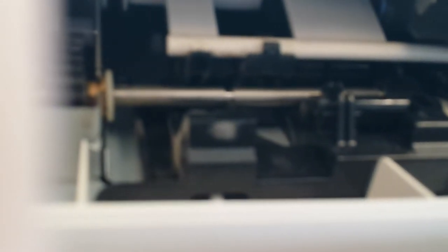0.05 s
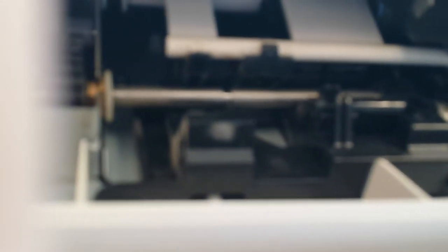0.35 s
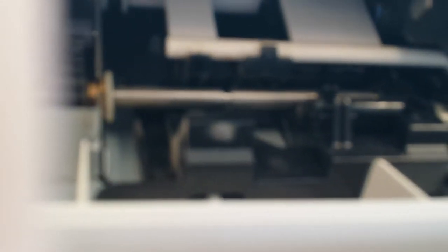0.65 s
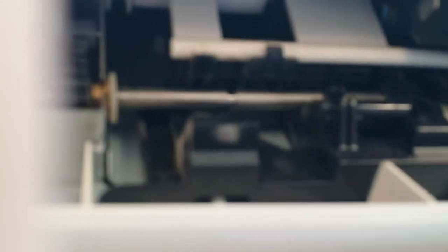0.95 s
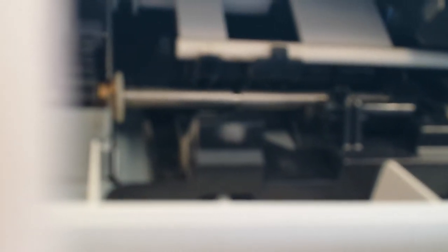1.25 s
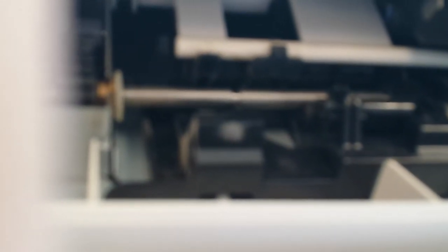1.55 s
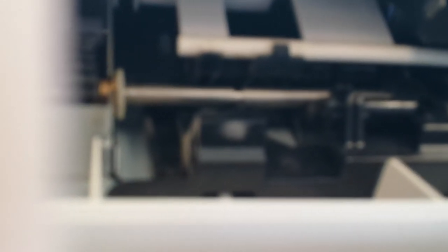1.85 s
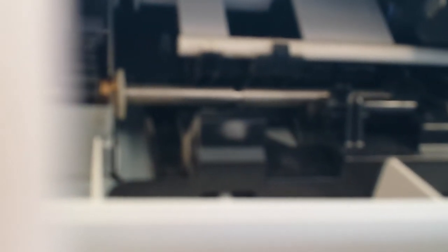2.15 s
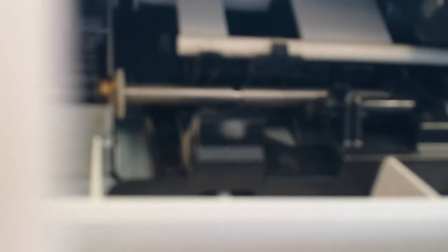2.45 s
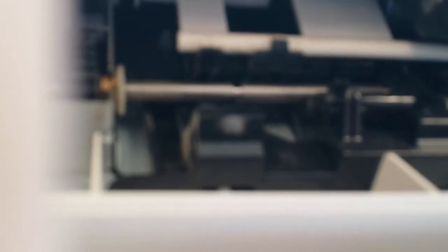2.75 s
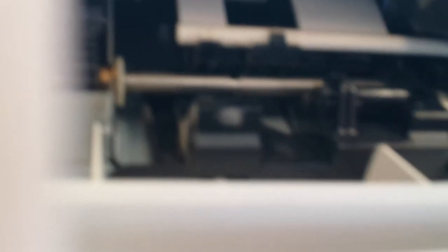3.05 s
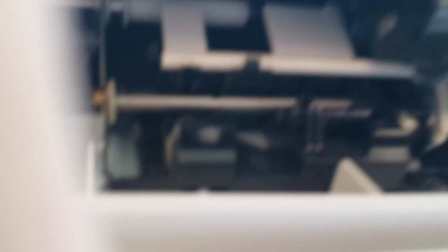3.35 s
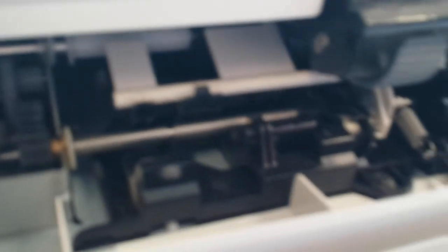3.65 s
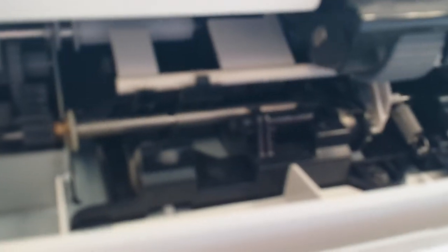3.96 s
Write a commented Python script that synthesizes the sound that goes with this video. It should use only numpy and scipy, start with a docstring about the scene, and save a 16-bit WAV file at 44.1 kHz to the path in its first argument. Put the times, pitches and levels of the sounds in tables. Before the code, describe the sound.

Plastic parts clack and thud inside a printer being handled, over a steady fan hum.

```python
"""Handling an open office machine

In a small room a fan hums over rushing air and a ringing duct. Plastic parts inside the machine are
handled: impacts excite the housing's resonances, pushed panels thud in their bending modes, a latch
snaps and the chassis rumbles. Sliding friction makes scuffs and a thin squeak. Near the end something
brushes along the housing close by, first on the left, then on the right."""
import sys
import numpy as np
from scipy import signal
from scipy.fft import rfft, irfft
from scipy.io import wavfile

SR = 44100
rng = np.random.default_rng(int(sys.argv[2]) if len(sys.argv) > 2 else 0)


def to_wav(sig):
    """Store sig (one row per channel, or 1-D mono) as 16-bit WAV at the path in sys.argv[1].

    Samples outside -1..1 are clipped; the rate is SR.
    """
    pcm = np.clip(np.atleast_2d(sig), -1, 1) * 32767
    pcm = np.round(pcm).astype(np.int16)
    wavfile.write(sys.argv[1], SR, pcm.T)  # frames by channels


N = 176400
T = np.arange(N) / SR
HZ = np.maximum(np.arange(N // 2 + 1) * SR / N, 1)
FAN_WANDER_HZ = 1.168
# pushes on the panels: t/s, relative level/dB, f/Hz of the pushed spot
PUSHES = [(.415, -27.5, 715), (.430, -30.5, 180), (.431, -31, 380), (.452, -34, 200), (1.271, -35, 175),
          (1.293, -30, 180), (1.297, -39.5, 770), (1.544, -31, 540), (1.600, -25, 520), (1.767, -25, 510),
          (1.775, -36, 109), (1.81, -35, 560), (1.966, -25, 375), (1.972, -30, 210), (2.015, -33, 253),
          (2.072, -26.5, 320), (2.080, -26.5, 500), (2.084, -32, 100), (2.100, -27.5, 540),
          (2.106, -22, 295), (2.115, -29, 155), (2.162, -29.5, 240), (2.167, -27, 410), (2.644, -24, 300),
          (2.646, -27.5, 545), (2.666, -27.5, 540), (2.66, -34, 150), (2.884, -36, 190),
          (2.958, -34.5, 740), (3.018, -36.5, 620), (3.133, -30.5, 720), (3.86, -35, 270)]


def from_db(db):
    """Amplitude grows tenfold for every 20 dB."""
    return 10 ** (np.asarray(db) / 20)


def rms_one(x):
    """Normalisation to unit rms."""
    return x / np.sqrt(np.mean(x ** 2) + 1e-20)


def pan(db):
    """Interaural level difference: the two gains for a pan of left minus right, in dB."""
    return from_db(np.array([[1], [-1]]) * db / 2)


def per_hz(points):
    """Interpolation of (f/Hz, value) points on a logarithmic frequency axis."""
    hz, value = np.transpose(points)
    return np.interp(np.log(HZ), np.log(hz), value)


def drift(corner_hz):
    """Random fluctuation: low-passed Gaussian noise of unit rms."""
    return rms_one(irfft(rfft(rng.standard_normal(N)) / (1 + (HZ / corner_hz) ** 2), N))


def colour(x, shape_db):
    """Minimum-phase filtering to a spectral shape, scaled so that white noise keeps its power."""
    cepstrum = irfft(np.log(rms_one(from_db(shape_db))), N)
    cepstrum[1:N // 2] *= 2
    cepstrum[N // 2 + 1:] = 0
    response = irfft(np.exp(rfft(cepstrum)), N)[:SR // 8]
    return signal.fftconvolve(x, response[None], axes=1)[:, :N]


def stereo_noise():
    """Partly coherent white noise: the sides are alike in the bass, nearly unrelated in the treble."""
    # likeness of left and right: f/Hz, correlation
    coherence = [(60, 0.95), (250, 0.83), (500, 0.72), (900, -0.51), (1500, -0.62), (3000, 0),
                 (15000, -0.13)]
    alike = np.clip(per_hz(coherence), -1, 1)
    mid, side = rfft(rng.standard_normal((2, N))) * np.sqrt([(1 + alike) / 2, (1 - alike) / 2])
    return irfft(np.array([mid + side, mid - side]), N)


def decay(start, t60):
    """Free decay: a jump to 1, then an exponential fall of 60 dB in t60 seconds."""
    out = np.zeros(N)
    first = int(start * SR)
    age = T[:min(N - first, int(2 * t60 * SR))]
    out[first:first + len(age)] = np.exp(-np.log(1000) * age / t60)
    return out


def stroke_shape(peak_s, rise_s, fall_s):
    """Envelope of a sliding stroke: up 20 dB over the rise to 1, down 20 dB over the fall."""
    return from_db(-20 * np.abs((T - peak_s) / np.where(T < peak_s, rise_s, fall_s)) ** 1.44)


def housing_db():
    """Cavity resonance: the housing lifts narrow bands of the spectrum."""
    # resonances: f/Hz, width/Hz, lift/dB
    resonances = [(1236, 72, 2), (1454, 95, 3), (1830, 40, 4), (2220, 130, 2.5), (2317, 54, 6),
                  (3940, 620, 2.5), (5870, 150, 6.5), (6410, 220, 4)]
    return sum(db / (1 + (2 * (HZ - hz) / width) ** 2) for hz, width, db in resonances)


def fan():
    """Broadband flow noise, duct resonance on the right and the weaker tones of fan and motor."""
    # fan air and room noise: f/Hz, relative spectral level/dB
    air_spectrum = [(20, -14.5), (45, -7.5), (80, -5), (130, -5), (290, 0), (385, -7.5), (520, -4),
                    (750, -10), (1100, -16), (2000, -16.5), (3000, -20), (4500, -18), (6000, -13.5),
                    (7300, -28.5), (10000, -36.5), (13000, -45), (15500, -55)]
    # balance of the rushing air: f/Hz, pan/dB
    air_pan = [(60, 2), (200, 0), (380, 1.5), (700, 1.5), (1300, -0.5), (4400, -2), (7500, 9.5),
               (13000, -2)]
    # air ringing in the duct: f/Hz, relative spectral level/dB
    duct_spectrum = [(600, -7), (1000, -23.5), (1600, -8), (2050, 2.5), (2350, 4), (2700, -9), (3300, -27),
                     (7000, -17.5), (10500, -25), (15000, -48.5)]
    # the duct as the listener shifts position: t/s, level/dB, pan/dB
    duct_course = [(0, -46, -14.5), (1.2, -47.5, -17), (2.4, -43.5, -13.5), (2.8, -46.5, -13),
                   (3.25, -43, -9.5), (3.42, -53, -1), (4, -53.5, -2)]
    # fan and motor tones: f/Hz, relative level/dB, pan/dB
    tones = [(196, -54, 0), (299, -55, 0), (597.5, -57, 0), (673, -57.5, 2), (925.5, -61.5, 0),
             (1238, -60.5, -6), (1838, -63, -4), (2019, -56.5, -4), (5828, -67, 0), (6481, -62.5, -3),
             (6599, -63, 0)]
    air_db, tones_db, flutter_db = -39.5, -1.53, 3.33
    air = irfft(rfft(stereo_noise()) * pan(per_hz(air_pan)), N)
    out = from_db(air_db) * colour(air, per_hz(air_spectrum))
    times, duct_db, duct_pan_db = np.transpose(duct_course)
    duct = from_db(np.interp(T, times, duct_db)) * colour(stereo_noise(), per_hz(duct_spectrum))
    for hz, db, pan_db in tones:
        phase = 2 * np.pi * (np.cumsum(hz + FAN_WANDER_HZ * drift(5.13)) / SR + rng.random())
        amplitude = np.sqrt(2) * from_db(tones_db + db + flutter_db * drift(4))
        out += pan(pan_db) * amplitude * np.sin(phase)
    return out + pan(np.interp(T, times, duct_pan_db)) * duct


def hum():
    """The fan's main tone, placed to the right by interaural differences of phase and level."""
    # the tone swells and sinks: t/s, level/dB
    swells = [(0, -42.5), (.35, -40), (.8, -39.5), (1.4, -40.5), (2.1, -41.5), (2.5, -41), (3, -42),
              (3.4, -40.5), (4, -40.5)]
    hum_hz, flutter_db, right_lead_rad = 462.8, 1.23, 0.36
    phase = 2 * np.pi * np.cumsum(hum_hz + FAN_WANDER_HZ * drift(7.1)) / SR
    level_db = np.interp(T, *np.transpose(swells)) + flutter_db * drift(4.4)
    return pan(-3.5) * from_db(level_db) * np.sqrt(2) * np.sin([phase, phase + right_lead_rad])


def rumble():
    """Damped oscillation of the heavy chassis, set swaying by the hardest clack."""
    start_s, sway_hz = 2.09, 37.5
    envelope = from_db(-45 + 2 * drift(8)) * decay(start_s, t60=1.9)
    return envelope * np.sqrt(2) * np.sin(2 * np.pi * sway_hz * (T - start_s))


def squeak():
    """Friction-excited vibration: a sliding part sings briefly on a few wavering partials."""
    # partials of the squeak: f/Hz, level/dB
    partials = [(2355, -49), (2660, -47.5), (2945, -55)]
    waver_hz = 14
    tone = np.zeros((2, N))
    for hz, db in partials:
        cycles = np.cumsum(hz + waver_hz * drift(60)) / SR + rng.random((2, 1))
        tone += from_db(db) * np.sin(2 * np.pi * cycles)
    return np.sqrt(2) * stroke_shape(3.255, rise_s=.07, fall_s=.14) * tone


def rubs():
    """Sliding friction: a band of grainy noise catches unevenly as each stroke swells and fades."""
    # scuffs and brushes: peak t/s, rise/s, fall/s, level/dB, centre f/Hz, width/octaves, pan/dB
    strokes = [(.025, 0.035, 0.052, -37, 6000, 0.54, 2), (0.29, 0.49, 0.31, -48.5, 6500, 0.49, 2),
               (.826, 0.023, 0.063, -35, 5200, 0.42, 1), (0.84, 0.036, 0.11, -40, 1300, 1, -4),
               (1.975, .02, .025, -33, 1400, .7, 0), (2.035, .045, .06, -33, 1350, .8, 0),
               (2.955, 0.077, 0.16, -38, 5000, 0.64, 13.5), (3.0, 0.12, 0.49, -43.5, 900, 0.91, 9),
               (3.07, 0.052, .12, -46, 7000, 0.56, 0), (3.205, 0.28, 0.19, -39, 6150, 0.6, -2.5),
               (3.19, 0.15, .07, -40.5, 6050, .12, 8), (2.92, 0.053, 0.099, -41, 6050, .12, 8),
               (3.478, 0.12, 0.098, -33.5, 6220, .4, -17), (3.53, 0.16, 0.086, -36.5, 2800, 0.8, -14),
               (3.585, 0.1, 0.045, -39.5, 2950, 0.84, -16.5), (3.49, 0.11, 0.19, -40, 900, 0.5, -6.5),
               (3.56, 0.075, 0.16, -40.5, 5700, 0.5, 8), (3.84, 0.44, 0.41, -46.5, 6500, 0.54, -4),
               (3.8, .3, .5, -47.5, 1370, 0.62, 3)]
    catch_db, grain_db, skirt_db = 1.3, 1.5, 49.5
    out = np.zeros((2, N))
    for peak_s, rise_s, fall_s, db, hz, octaves, pan_db in strokes:
        stroke = stroke_shape(peak_s, rise_s, fall_s) * from_db(catch_db * drift(40))
        band_db = skirt_db * (1 - np.sqrt(1 + (np.log2(HZ / hz) / octaves / 2) ** 2))
        friction = rng.standard_normal((2, N)) * from_db(grain_db * drift(250))
        out += pan(pan_db) * from_db(db) * colour(stroke * friction, band_db + housing_db())
    return out


def panel_rattle():
    """Modal response: each uneven push drives chiefly the panel modes near its own pitch."""
    # panel modes: f/Hz, relative level/dB, t60/s
    modes = [(80, -3.5, 0.13), (131.7, 6, 0.065), (183, -1, 0.085), (211, -4, 0.08), (262, -3, 0.062),
             (319, 0, 0.074), (392, 0, 0.07), (515.5, -1, 0.07), (575, -1, 0.07), (640, -6, 0.039),
             (730, -3, 0.064), (826, -8, 0.058)]
    spread_octaves, chatter_db, top_hz = 0.48, 1.5, 1330
    times, push_db, push_hz = np.transpose(PUSHES)
    fade = decay(0, t60=.11)[:SR // 8]
    out = np.zeros(N)
    for hz, mode_db, t60 in modes:
        force = np.zeros(N + SR)
        coupling = np.exp(-(np.log2(hz / push_hz) / spread_octaves) ** 2 / 2)
        strengths = from_db(push_db + mode_db) * coupling
        for first, strength in zip((times * SR).astype(int), strengths):
            push = from_db(chatter_db) * fade * rng.standard_normal(len(fade)) / np.linalg.norm(fade)
            push[0] += rng.choice([-1, 1])  # impulse of first contact
            force[first:first + len(fade)] += strength * push
        radius, angle = np.exp(-np.log(1000) / (t60 * SR)), 2 * np.pi * hz / SR
        resonator = [1, -np.cos(angle)], [1, -2 * radius * np.cos(angle), radius ** 2]
        out += signal.lfilter(*resonator, force[:N] + 1e-18)
    return signal.sosfilt(signal.butter(3, top_hz, fs=SR, output="sos"), out)  # pushes are soft


def hollow_rings():
    """Damped transients: each pushed spot swells into a few cycles, more slowly at low pitch."""
    out = np.zeros(N)
    for (start_s, db, hz), phase in zip(PUSHES, rng.random(len(PUSHES))):
        age = np.maximum(T - start_s, 0)
        swell_s = .0065 * (500 / hz) ** .45
        envelope = (age / swell_s * np.exp(1 - age / swell_s)) ** 2
        out += from_db(db) * envelope * np.sin(2 * np.pi * (hz * age + phase))
    return out


def thuds():
    """Flexing panels rattle and ring hollow; reverberation in the cavity prolongs both."""
    rattle_db, ring_db, echo_db = -6.5, -2.5, -4
    direct = from_db(rattle_db) * panel_rattle() + from_db(ring_db) * hollow_rings()
    cavity = rms_one(stereo_noise() * decay(0, t60=.2)) / np.sqrt(N)
    return direct + from_db(echo_db) * signal.fftconvolve(direct[None], cavity, axes=1)[:, :N]


def latch():
    """Impulse excitation: the small latch springs home and rings in its modes."""
    # latch modes: f/Hz, relative level/dB, t60/s
    modes = [(4900, 0, .022), (5300, 0, .02), (5900, -1, .016), (8200, -3, .008), (10400, -9, .006)]
    start_s, attack_s, gain_db = 2.1035, .0004, -20.5
    age = T - start_s
    ring = np.zeros((2, N))
    for hz, db, t60 in modes:
        ring += from_db(db) * decay(start_s, t60) * np.sin(2 * np.pi * (hz * age + rng.random((2, 1))))
    return from_db(gain_db) * np.clip(age / attack_s, 0, 1) * ring


def clacks():
    """Impact noise of plastic parts: a crack, a chattering ring in the housing, a faint room tail."""
    # knocks: t/s, relative body level/dB, relative snap level/dB, snap top f/Hz, ring t60/s, snap pan/dB
    knocks = [(0.414, -37, -25, 8650, 0.21, 2), (.497, -53, -29, 5900, .08, -4),
              (0.816, -39, -30, 5500, .12, 12), (0.952, -30.5, -33, 6000, 0.056, 12),
              (1.296, -38, -31.5, 7060, 0.062, 0), (1.545, -19, -31, 7240, 0.11, -4),
              (1.558, -26.5, -44, 5000, 0.11, 2), (1.588, -24.5, -39, 4980, 0.071, -3),
              (1.684, -32, -30.5, 6500, 0.12, 4), (1.766, -31, -26, 6000, 0.12, -5),
              (1.783, -24.5, -29.5, 7000, 0.096, 1), (1.8099, -44, -23.5, 16000, .015, -4),
              (1.817, -29, -30, 14200, 0.06, 2), (1.952, -25, -21.5, 12900, 0.093, 3.5),
              (1.968, -30, -30, 9000, 0.09, 5), (2.0045, -31, -29.5, 12500, 0.08, 7),
              (2.0225, -29, -28, 9000, 0.13, 7), (2.039, -33, -33, 8000, 0.13, 2),
              (2.083, -23, -20.5, 12000, 0.095, 4.5), (2.098, -32, -17, 6900, 0.098, 2),
              (2.1026, -46, -15.5, 10800, 0.017, -4), (2.114, -37, -32, 6900, 0.077, 0),
              (2.182, -26.5, -46, 5000, 0.065, 0), (2.4, -33, -35, 6500, .07, -2),
              (2.568, -23, -24.5, 7000, 0.046, -2), (2.640, -23, -23, 5200, 0.13, -2),
              (2.772, -60, -36, 16000, .015, -4), (2.847, -58, -31, 16100, 0.017, 0),
              (2.936, -45, -29, 13000, .04, 3), (3.075, -42, -28, 11800, 0.048, 2),
              (3.135, -31, -40, 5000, .07, 0), (3.311, -44, -33, 11000, .04, 0),
              (3.726, -46, -34.5, 10000, 0.031, -3), (3.792, -37, -33.5, 12000, 0.043, 3),
              (3.864, -39, -36.5, 15000, .02, -12)]
    # colour of the hollow body: f/Hz, relative spectral level/dB
    body_spectrum = [(200, -28), (600, -5.5), (1000, 1.5), (1500, 0.5), (2200, 6.5), (2900, -8.5),
                     (4000, -9), (7000, -23), (15000, -50)]
    # colour of the snap: f/Hz, relative spectral level/dB
    snap_spectrum = [(800, -36), (2500, -7.5), (4000, -13.5), (5200, -2.5), (6000, -3), (7200, -7),
                     (10000, -11), (12500, -17), (15500, -27)]
    chatter_db, room_db, body_pan_db = 2, -22, -5
    body, snap = np.zeros((2, 2, N))
    chatter = from_db(chatter_db * drift(400))
    body_noise, snap_noise = stereo_noise() / 2, stereo_noise() / 2
    for start_s, body_db, snap_db, top_hz, ring_t60, pan_db in knocks:
        crack = decay(start_s, t60=.012)
        ring = chatter * decay(start_s, ring_t60)
        room_tail = from_db(room_db) * decay(start_s, t60=0.39)
        attack_s = 0.0059 * (5240 / top_hz) ** 2.4  # a dull knock builds up more slowly
        envelope = (crack + ring + room_tail) * np.clip((T - start_s) / attack_s, 0, 1)
        body += from_db(body_db) * envelope * body_noise
        softness = signal.butter(3, top_hz, fs=SR)
        snap += pan(pan_db) * from_db(snap_db) * signal.lfilter(*softness, envelope * snap_noise + 1e-18)
    body = colour(body, per_hz(body_spectrum) + housing_db())
    snap = colour(snap, per_hz(snap_spectrum) + housing_db())
    return pan(body_pan_db) * body + snap


def scene():
    """Superposition of the running machine and the handling."""
    return hum() + fan() + clacks() + latch() + thuds() + rumble() + rubs() + squeak()


def record(dry):
    """Band limiting: a steep elliptic low-pass removes the highest treble."""
    cutoff_hz = 15300
    return signal.sosfilt(signal.ellip(10, .1, 80, cutoff_hz, fs=SR, output="sos"), dry)


dry = scene()
out = record(dry)
to_wav(out)
```